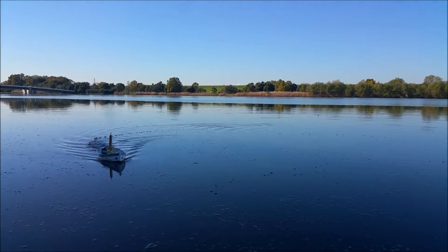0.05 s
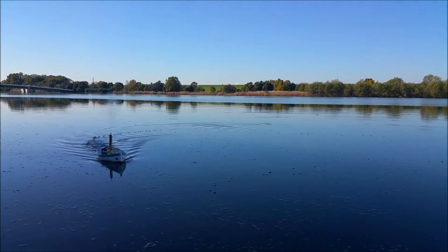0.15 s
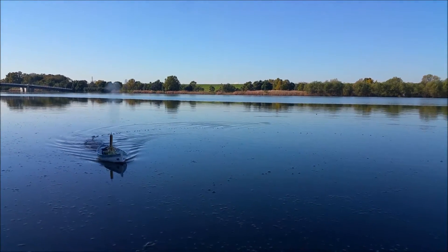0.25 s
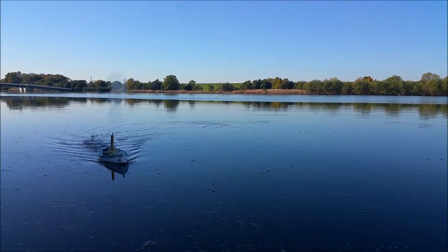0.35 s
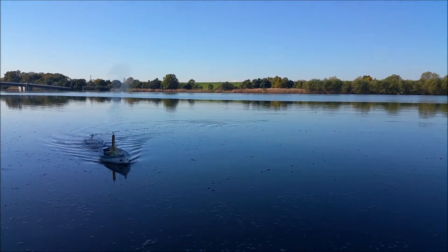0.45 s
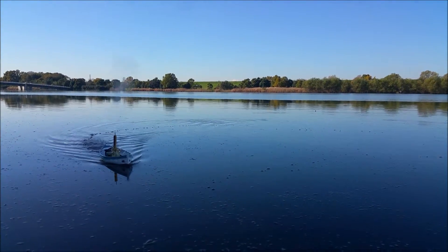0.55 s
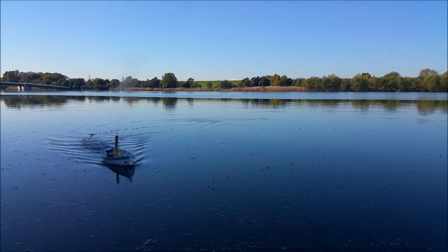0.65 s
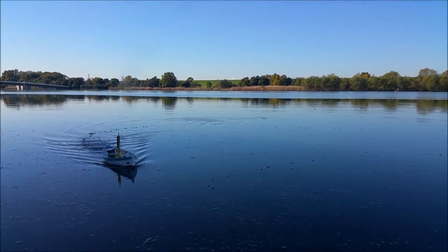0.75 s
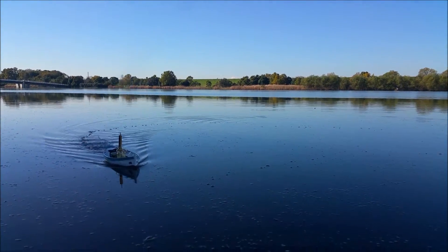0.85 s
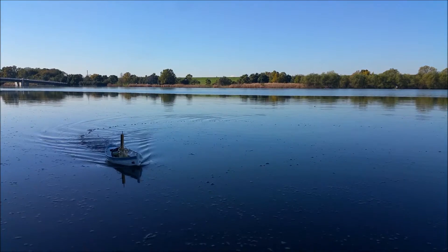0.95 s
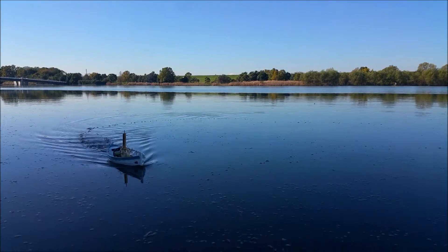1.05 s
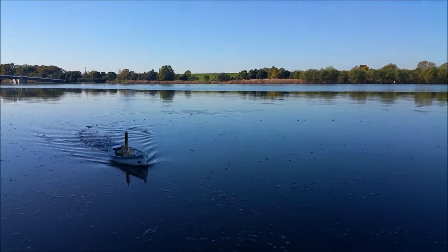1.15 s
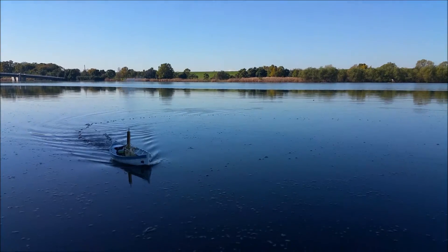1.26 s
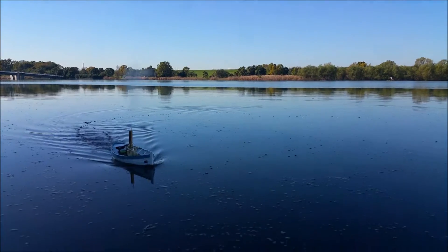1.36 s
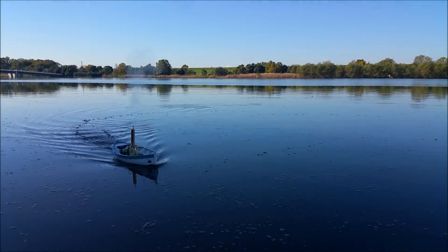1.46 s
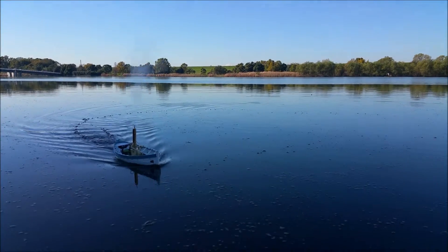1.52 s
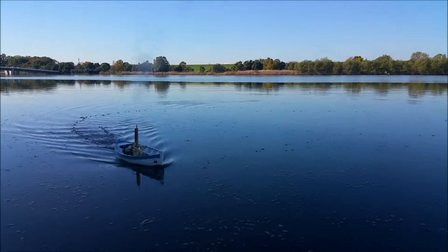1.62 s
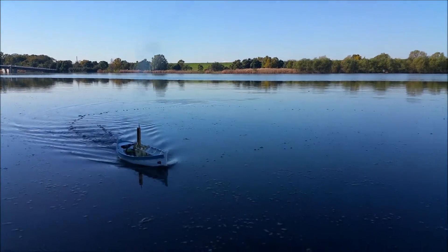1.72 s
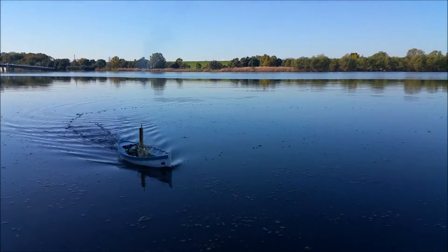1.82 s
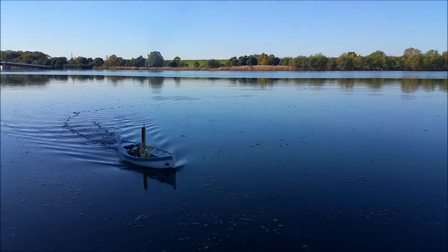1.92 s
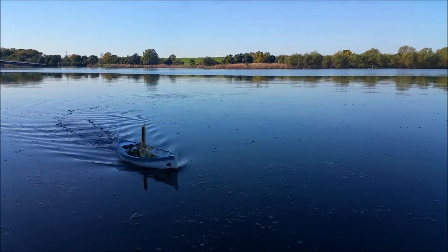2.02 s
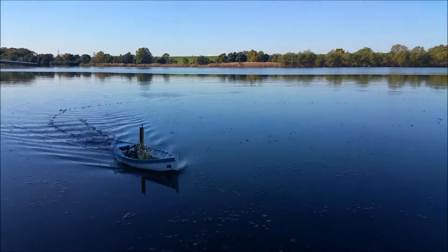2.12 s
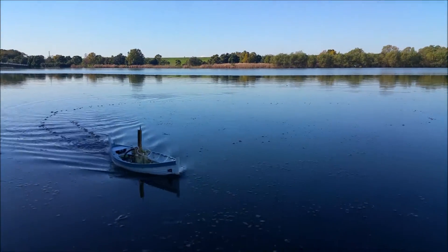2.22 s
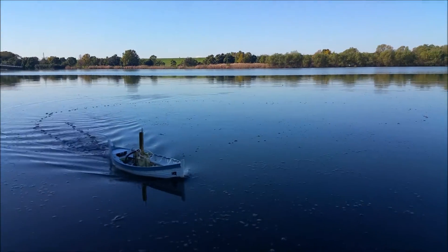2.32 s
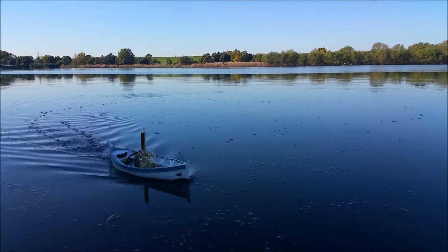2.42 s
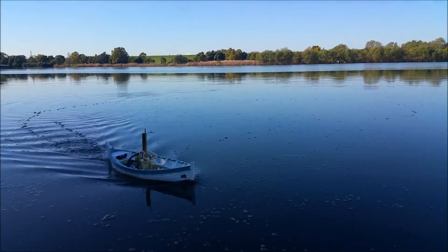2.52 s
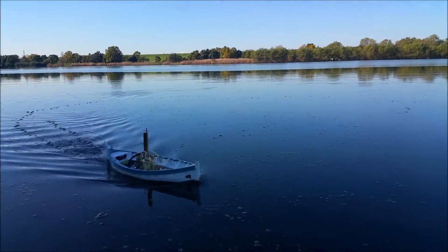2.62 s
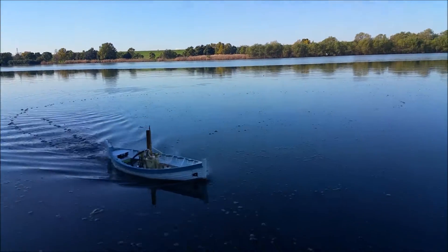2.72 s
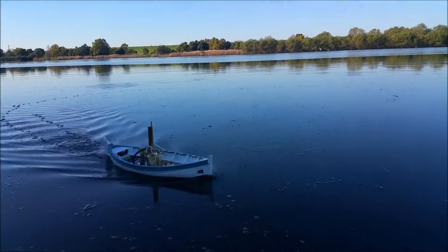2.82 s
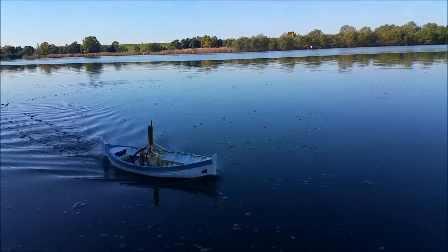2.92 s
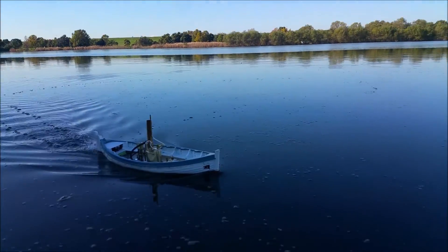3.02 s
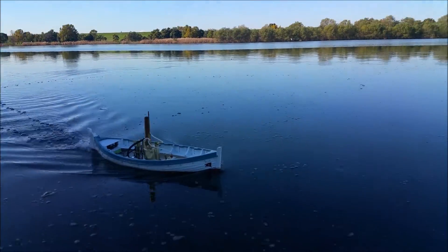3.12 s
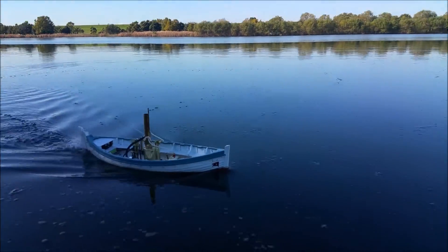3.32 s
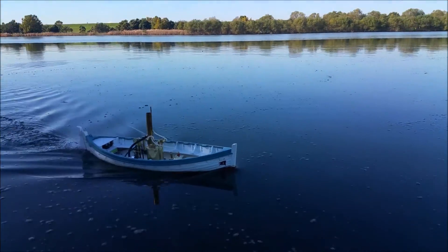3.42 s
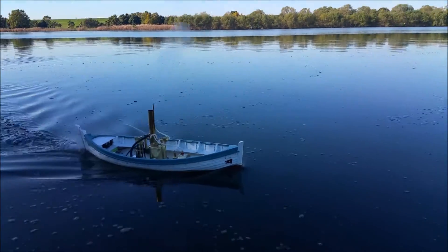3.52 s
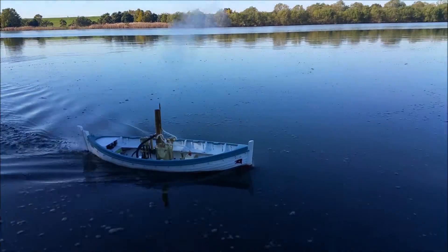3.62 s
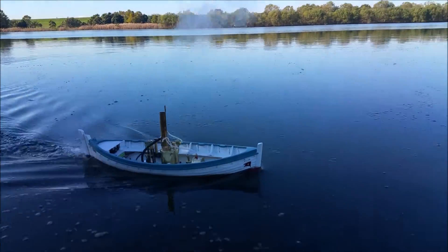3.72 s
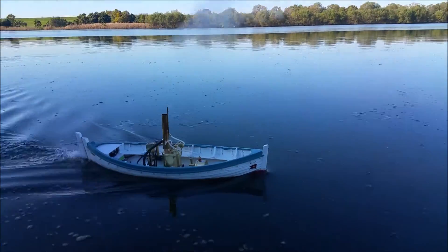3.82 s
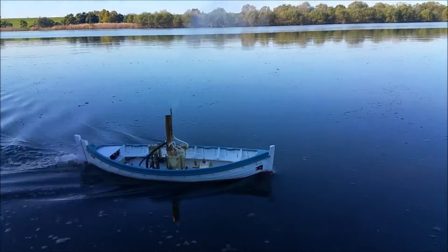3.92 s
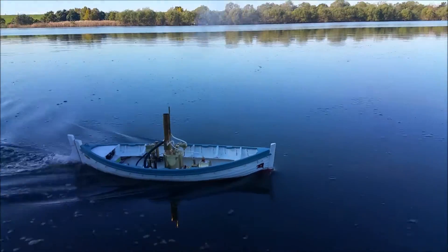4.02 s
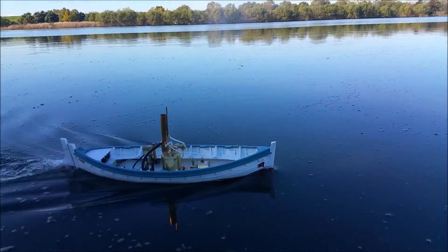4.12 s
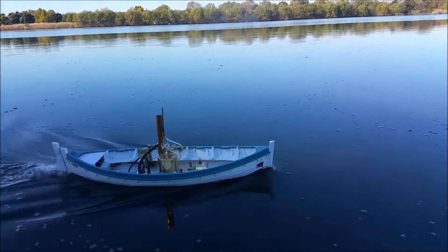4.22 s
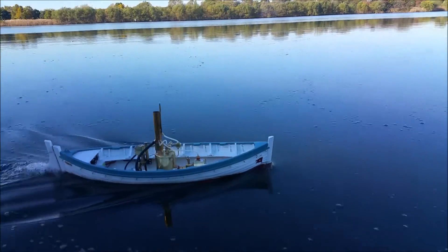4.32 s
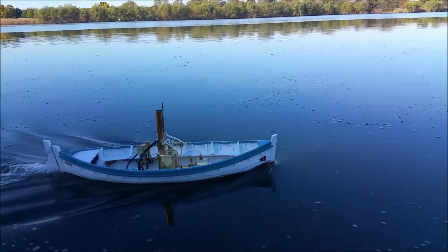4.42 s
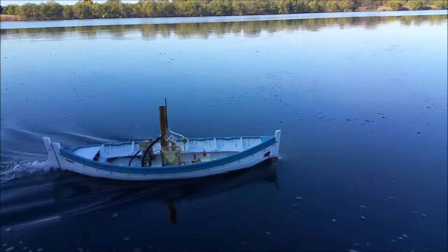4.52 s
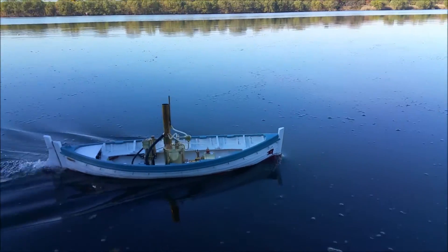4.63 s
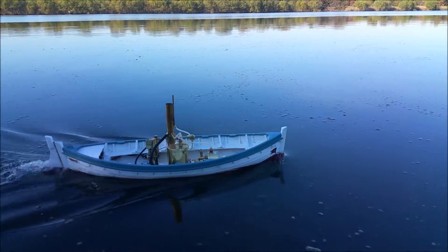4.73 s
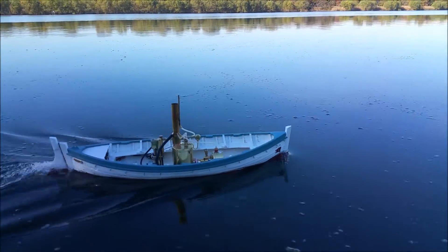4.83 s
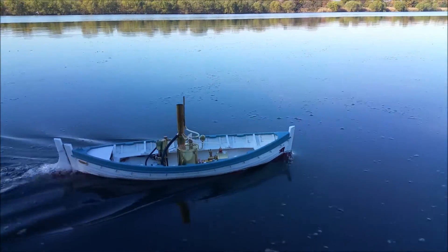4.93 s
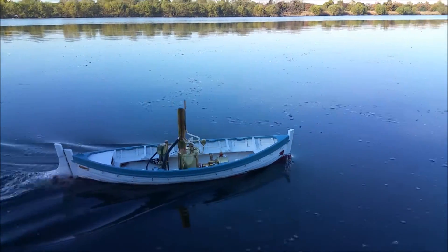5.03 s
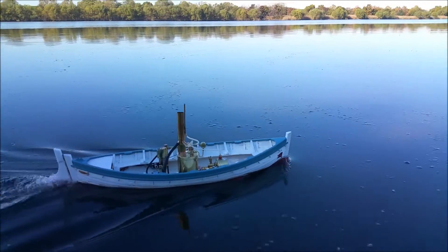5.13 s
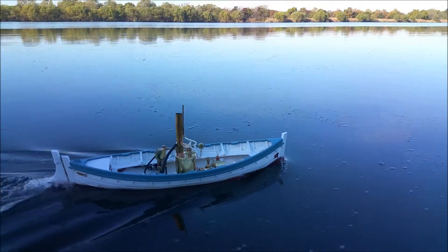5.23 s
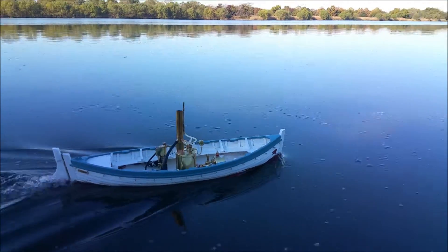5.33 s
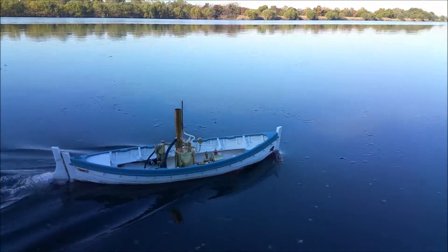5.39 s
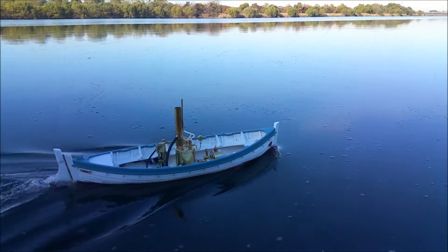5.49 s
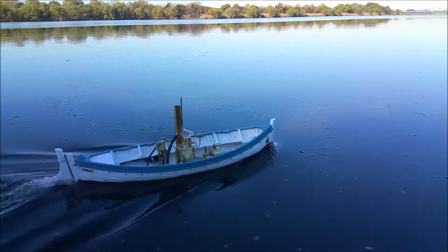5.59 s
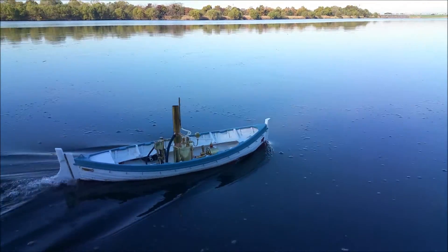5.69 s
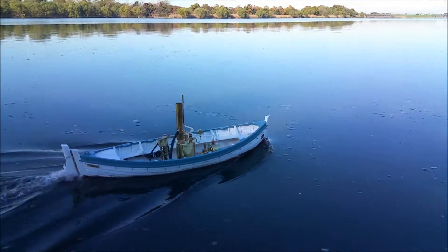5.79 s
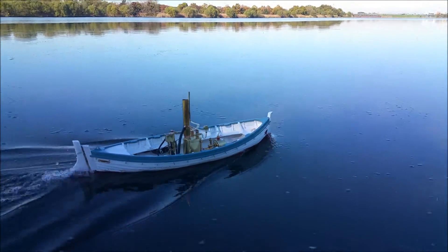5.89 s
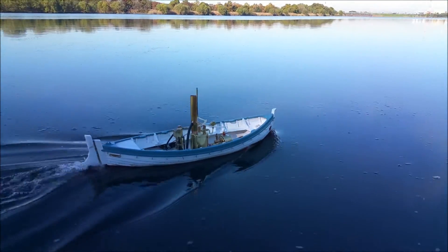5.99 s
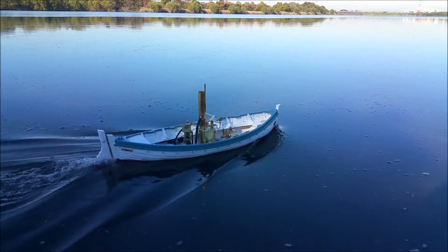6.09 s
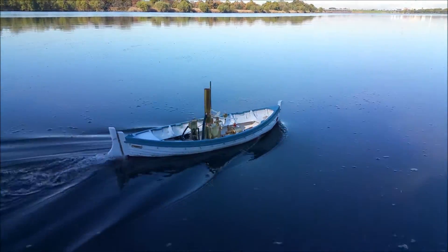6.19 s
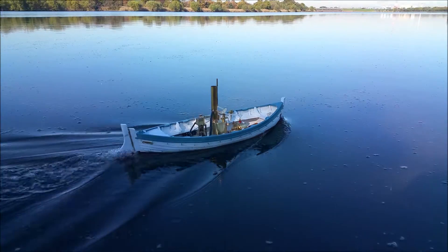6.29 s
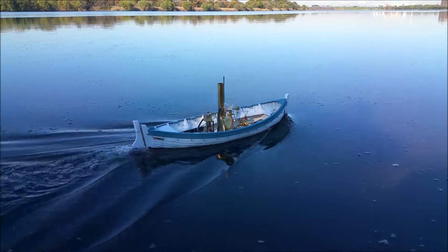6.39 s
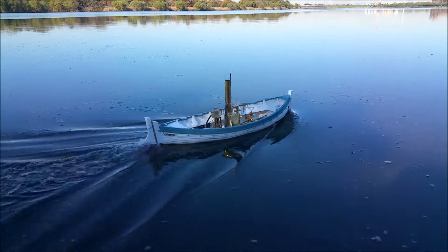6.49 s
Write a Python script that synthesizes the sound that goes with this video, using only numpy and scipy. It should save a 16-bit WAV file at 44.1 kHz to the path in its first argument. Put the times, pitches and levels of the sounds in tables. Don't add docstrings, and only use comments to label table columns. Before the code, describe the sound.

A small steam boat passes on a quiet lake, heard through a close little stereo microphone. From the start a hollow, breathy burner roar runs steadily over a faint distant rumble. After a tiny spit of steam, a very shrill whistle near 5.6 kHz sounds from 0.15 to 0.64 s, wavering between left and right; a second follows from 1.2 to 1.8 s. Both have steam hiss and faint quick echoes from the banks. The roar swells slowly, with occasional soft flame pops and a light metallic tick. A third, louder, fuller blast runs from 3.6 to 4.2 s. From about 4.4 s the boat is closest: fast, uneven valve-gear rattle at roughly 86 beats a second, leaking steam, crisp clicks, and many gurgling wake bubbles from 4.7 s. The sound eases only slightly by 6.5 s.

```python
import sys
import numpy as np
from scipy import signal
from scipy.io import wavfile
from scipy.ndimage import uniform_filter1d

SR = 44100
rng = np.random.default_rng(int(sys.argv[2]) if len(sys.argv) > 2 else 0)


def how_loud(loudness_db):
    steps = np.asarray(loudness_db, float) / 20
    return 10 ** steps


def wav_record(signal):
    frames = np.transpose(np.atleast_2d(signal))
    bounded = np.clip(frames, -1, 1)
    quanta = np.round(bounded * 32767).astype(np.int16)
    wavfile.write(sys.argv[1], SR, quanta)


N = 288855
T = np.arange(N) / SR
RATTLE_SLOPE = 1.58


def evened(x):
    return x / np.sqrt(np.mean(x ** 2) + 1e-20)


def read(points, hz):
    f, value = np.transpose(points)
    return np.interp(np.log(hz + 1), np.log(f + 1), value, left=-90, right=-90)


def curve(rows, t, column=1):
    return np.interp(t, [r[0] for r in rows], [r[column] for r in rows])


def add(mix, s, sound):
    part = mix[..., round(s * SR):][..., :sound.shape[-1]]
    part += sound[..., :part.shape[-1]]


def resonate(x, hz, width):
    return signal.lfilter(*signal.iirpeak(hz, hz / width, SR), x)


def ports(x, lead):
    return np.array([x, np.interp(np.arange(N) - lead, np.arange(N), x)])


def wander(rate):
    f = np.geomspace(.1 * rate, rate, num=24)[:, None]
    swings = np.sin(2 * np.pi * (f * T[::64] + rng.random(f.shape)))
    coarse = (swings / np.sqrt(f)).sum(0)
    return np.interp(T, T[::64], evened(coarse))


# t/s, nearness under the closest point level/dB, funnel note f/Hz, funnel mouth level/dB
PASS = [(0, -9.5, 1700, 1), (.4, -7.5, 1684, 1.5), (1.5, -6.5, 1765, -3), (2.05, -5, 1800, -1.5),
        (2.5, -5, 1770, -16), (2.95, -3, 1870, -6), (3.5, -2, 1830, -10), (4.1, -2.5, 1740, 0),
        (4.55, 0, 1755, 1), (5.75, 0, 1790, 4.5), (6.4, -0.5, 1753, 2), (6.55, -1, 1760, -0.5)]


def level(top_db, slope, flicker_db):
    return how_loud(top_db + slope * curve(PASS, T) + flicker_db * wander(rate=12))


# t/s, left lead [samples]
LEAD = [(0, 9.5), (3.5, 3.8), (4.2, 11.1), (5.2, 7.4), (6.55, 5.3)]
# f/Hz, likeness [0-1]
SAME = [(30, .9), (250, 0.97), (700, 0.96), (1400, 0.13), (2800, 0.21), (6000, 0.074), (15000, 0.057)]


def noise(colour, patchy_db, alike=0., lead=LEAD):
    t = np.arange(N // 256 + 5)[:, None] * 256 / SR
    hz = np.fft.rfftfreq(1024, 1 / SR)
    a, b, c, d, patches = np.moveaxis(rng.standard_normal((len(t), len(hz), 5)), 2, 0)
    patches = uniform_filter1d(patches, size=8, axis=0)
    patches = evened(uniform_filter1d(patches, size=10, axis=1))
    same_hz, likeness = np.transpose(SAME)
    same = np.clip(np.interp(np.log(hz + 1), np.log(same_hz), likeness), alike, 1)
    bend = hz / (hz + 1500)
    late = np.exp(-2j * np.pi * hz * curve(lead, t) / SR * bend)
    left = a + 1j * b
    right = same * late * left + np.sqrt(1 - same ** 2) * (c + 1j * d)
    z = np.array([left, right])
    size = how_loud(colour(t, hz) + 0 * t)
    z *= size / np.sqrt((size ** 2).sum(1, keepdims=True)) * how_loud(patchy_db * patches)
    return evened(signal.istft(z.transpose(0, 2, 1), nperseg=1024, noverlap=768)[1][:, :N])


# f/Hz, level/dB per Hz
SHORE = [(12, -48), (28, -24), (48, -2.5), (102, 1), (145, -3.5), (216, -16), (300, -11.5), (390, -41),
         (660, -120)]


def shore():
    return how_loud(-44) * noise(lambda t, hz: read(SHORE, hz), patchy_db=-0.5)


def mode_db(hz, mid_hz, width):
    return -20 * np.log10(1 + ((hz - mid_hz) / width) ** 2)


# f/Hz, level/dB per Hz
FAR = [(180, -47), (300, -15), (393, -5.5), (437, -6.5), (778, -2), (929, -12.5), (1020, -13),
       (1350, -24.5), (1670, -17.5), (2120, -22.5), (2590, -24.5), (5000, -41.5), (6500, -78),
       (11000, -120)]
# f/Hz, level/dB per Hz
NEAR = [(250, -15), (345, -16), (470, -0.2), (600, -0.9), (780, -16), (920, -7), (1050, -23.5), (1230, -14),
        (1450, -21.5), (2150, -22.5), (2420, -25.5), (4200, -30), (6000, -47)]
# t/s, share of the abeam colour [0-1]
TURN = [(0, 0.097), (2., 0.12), (3.2, 0.36), (4.5, 0.62), (6.55, 1.)]
# f/Hz, level/dB per Hz
BOOM = [(90, -18.5), (160, -2.5), (226, 5.5), (300, -4), (370, -54), (600, -3)]


def burner():
    def hull_db(t, hz):
        return read(FAR, hz) + curve(TURN, t) * (read(NEAR, hz) - read(FAR, hz))

    def funnel_db(t, hz):
        return mode_db(hz, curve(PASS, t, column=2), 75.0)

    def overtone_db(t, hz):
        return np.maximum(mode_db(hz, 2748, 44.), mode_db(hz, 3690, 60.) - 7)

    roar = noise(hull_db, patchy_db=1.51)
    note = noise(funnel_db, patchy_db=1.0, alike=0.96) * how_loud(curve(PASS, T, column=3))
    overtone = noise(overtone_db, patchy_db=.6, alike=.8)
    abeam_s, width_s, beam_db = 4.63, 0.5, 5.5
    overtone = overtone * how_loud(beam_db * np.exp(-((T - abeam_s) / width_s) ** 2))
    boom = noise(lambda t, hz: read(BOOM, hz), patchy_db=1.0)
    mix = roar * level(-27.5, slope=1.037, flicker_db=0.15)
    mix = mix + note * level(-40.5, slope=1, flicker_db=0.37)
    mix = mix + overtone * level(-47.5, slope=1.34, flicker_db=0.97)
    mix = mix + boom * level(-38, slope=1, flicker_db=1)
    return mix * how_loud([[.4], [-.4]])


# f/Hz, width/Hz, level/dB
GEAR = [(3700, 660, 11.5), (4505, 166, 13.5), (6050, 300, 6.5), (7650, 550, 3), (9000, 1500, 0),
        (11700, 3700, -4)]
# f/Hz, level/dB per Hz
AIR = [(2500, -14), (3200, -3), (7000, -2), (10000, -12), (15500, -17), (16500, -25)]


def engine():
    beats_per_s, unevenness = 86, .07
    turns = np.cumsum(beats_per_s * (1 + unevenness * wander(rate=3))) / SR
    luck = rng.standard_normal((700, len(GEAR) + 1)).clip(-2, 1.7)[turns.astype(int)]
    burst = np.exp(-(turns % 1) / .25) * how_loud(3.8 * luck[:, 0])
    rings = np.zeros((2, N))
    for k, (hz, width, db) in enumerate(GEAR):
        shake = burst * how_loud(db + 4 * luck[:, k + 1]) * rng.standard_normal((2, N))
        ring = resonate(resonate(shake, hz, width), hz, 1.5 * width)
        rings += ports(ring[0], curve(LEAD, T)) + 1.8 * ring * [[0], [1]]
    leak = noise(lambda t, hz: read(AIR, hz), patchy_db=1.7) * (1 + .9 * burst)
    return level(-45, RATTLE_SLOPE, flicker_db=1.5) * (0.71 * evened(rings) + evened(leak))


def taps(rows, cycles, glide, grit):
    out = np.zeros(N)
    for s, db, hz, snap_db in rows:
        u = np.arange(int(6 * cycles * SR / hz)) * hz / SR
        dull, bright = rng.standard_normal((2, 12000))
        ring = np.sin(2 * np.pi * u * (1 + glide * u / cycles))
        ring += grit * uniform_filter1d(dull, size=3)[:len(u)]
        ring += how_loud(snap_db + 7) * np.diff(bright)[:len(u)]
        envelope = np.exp(-u / cycles) * np.minimum(u / 0.43, 1)
        add(out, s, how_loud(db) * ring * envelope)
    return ports(out, curve(LEAD, T))


def faint_ticks():
    per_s, top_db, snap_db = 40, -40, -13
    luck = rng.random((int(per_s * N / SR), 3))
    s = luck[:, 0] * T[-1]
    db = top_db + RATTLE_SLOPE * curve(PASS, s) - 8 * luck[:, 1]
    hz = 3200 * 2 ** luck[:, 2]
    return np.transpose([s, db, hz, np.full(len(s), snap_db)])


# t/s, level/dB, f/Hz, snap level/dB
TICKS = [(2.473, -38, 5000, -18), (3.1101, -37, 3170, -6), (3.148, -52, 3750, -22),
         (3.4907, -37, 3870, -18), (4.3372, -34, 3530, -20), (4.429, -28, 5100, -28),
         (4.5004, -28, 5800, -21), (4.5912, -29.5, 5830, -24), (4.6406, -38, 3670, -24),
         (4.6944, -34, 4460, -18), (4.7812, -26, 5900, -7.5), (4.8276, -37, 3520, -23),
         (4.9977, -35, 3540, -38), (5.0446, -35, 4640, -21), (5.0925, -39, 6150, -22),
         (5.1145, -38, 3460, -21), (5.2452, -31, 6300, -23), (5.3045, -31.5, 5540, -20),
         (5.3739, -34, 6000, -24), (5.5051, -33, 4140, -5), (5.5425, -33, 5700, -21.5),
         (5.5914, -32, 3730, -17), (5.6243, -33, 6320, -21), (5.6518, -29, 5640, -26),
         (5.7934, -32, 3730, -21), (5.9336, -34, 3680, -21), (5.9935, -35, 3940, -17),
         (6.0419, -38, 4240, -21), (6.1137, -46, 4350, -18), (6.2918, -44, 3680, -13)]


def ticks():
    return taps([*TICKS, *faint_ticks()], cycles=8., glide=.003, grit=2.5)


# t/s, level/dB, f/Hz
PLOPS = [(4.723, -22, 870), (5.01, -20, 860), (5.09, -17, 1150), (5.214, -30, 960), (5.25, -15, 916),
         (5.285, -20, 910), (5.395, -19, 855), (5.541, -17.5, 880), (5.591, -19, 997), (5.645, -16, 925),
         (5.872, -23, 960), (5.944, -22, 851), (5.994, -18, 930), (6.114, -25, 990), (6.192, -17, 845),
         (6.351, -18, 870), (6.512, -21, 876)]
# t/s, level/dB, f/Hz
POPS = [(0.793, -20, 707), (0.946, -29, 614), (0.979, -25, 706), (1.042, -26, 493), (2.367, -21, 620),
        (2.582, -23, 627), (4.826, -17.5, 498), (5.323, -15.5, 605), (5.723, -21.5, 595), (5.897, -17, 540),
        (6.375, -15.5, 600)]
# t/s, level/dB, f/Hz
BUMPS = [
    (2.21, -37, 109),
    (4.28, -30.5, 112),
]


def wake():
    rows = [(*row, -45) for row in [*PLOPS, *POPS]]
    rows += [(*row, -68) for row in BUMPS]
    return taps(rows, cycles=3.55, glide=0.024, grit=.01)


def blast(rows, jet, voice):
    hiss_db, fizz_db, pan_db, octave0_db, octave1_db = jet
    pitch_hz, warm_s, lead0, lead1 = voice
    start, stop = rows[0][0], rows[-1][0]
    t = np.arange(start - .04, stop + .012, 1 / SR)
    held = t.clip(start, stop) - start
    share = held / held[-1]

    def slow(size):
        rough = rng.standard_normal((2, len(t)))
        return evened(uniform_filter1d(uniform_filter1d(rough, size), size))

    cold_hz, droop_hz_per_s, shut_hz, shut_s = 180, 32, 70, .006
    hz = pitch_hz - cold_hz * np.exp(-held / warm_s)
    hz = hz - droop_hz_per_s * held
    hz = hz - shut_hz * np.exp((held - held[-1]) / shut_s)
    missing = np.maximum(start - t, 0) / .0065 + np.maximum(t - stop, 0) / .0035
    waver_hz = 8. * slow(size=900)[0] + 8. * slow(size=160)[0] + (8. + 170 * missing) * slow(size=30)[0]
    phase = 2 * np.pi * np.cumsum(hz - 250 * missing + waver_hz) / SR

    left_db, right_db, lead = (curve(rows, t, k) for k in range(1, 4))
    note = how_loud([left_db, right_db] + 0.91 * slow(size=200)) * np.sin([phase + lead, phase])
    octave_lead = lead0 + (lead1 - lead0) * share
    octave_db = octave0_db + (octave1_db - octave0_db) * share
    octave_db = octave_db + 2.3 * slow(size=150) + 2.5 * slow(size=900)[0] + [[pan_db], [0]]
    octave = how_loud(octave_db) * np.sin([2 * phase + octave_lead, 2 * phase])
    speaks = how_loud(-15 * missing ** 1.6)
    closed = np.maximum(start + warm_s - t, 0) / (1.3 * warm_s + .006)
    closed = closed + np.maximum(t - stop, 0) / .004
    flow = how_loud([[hiss_db], [fizz_db]] - 14 * closed ** 3)
    return t[0], (note + octave * speaks ** 2) * speaks, flow


# delay t/s, level/dB
BANKS = [
    (.03, -28),
    (.045, -29),
    (.07, -33),
    (.097, -36),
    (.104, -36),
    (.2, -41),
]


def banks():
    t = np.arange(SR // 2) / SR
    fade = (how_loud(-60 * t / .42) + 3.5 * how_loud(-60 * t / .12)) * (t > .004)
    sparse = rng.choice([-1., 1.], (2, len(t))) * (rng.random((2, len(t))) < .03)
    echo = sparse * fade
    echo *= how_loud(-24) / np.linalg.norm(echo[0])
    for delay_s, db in BANKS:
        add(echo, delay_s, how_loud(db) * np.array([[1., 0, 0], [0, 0, 1.]]))
    return signal.lfilter(*signal.butter(3, 7500, fs=SR), echo)


# t/s, left peak level/dB, right peak level/dB, left lead [rad]
BLASTS = [
    [(.152, -19, -18, -2.8), (.167, -12, -11, -3.0), (.227, -21, -14, -5.0), (.267, -26, -9, -9.4),
     (.292, -16, -10, -8.2), (.352, -10, -10, -9.4), (.367, -8, -9, -8.9), (.587, -16, -11, -9.9),
     (.637, -15, -12, -9.5)],
    [(1.203, -14, -14, -3.6), (1.243, -15, -14, -3.7), (1.283, -29, -27, -1.7), (1.303, -11, -10, -3.5),
     (1.458, -6, -13, -3.7), (1.548, -18, -14, -3.9), (1.588, -15, -15, -2.5), (1.658, -13, -11, -4.1),
     (1.818, -18, -11, -4.4)],
    [(3.589, -10, -8, -5.2), (3.65, -12, -23, -5.0), (3.664, -7, -13, -5.6), (3.84, -8, -6, -4.7),
     (3.895, -15, -9, -3.5), (4.005, -4, -10, -3.3), (4.07, -11, -9, -4.9), (4.085, -7, -8, -3.3),
     (4.195, -9, -7, -4.8)],
]
# hiss level/dB, fizz level/dB, octave left-right level/dB, octave level/dB at start, at end
JETS = [
    (-39.5, -38, -10, -43, -40.5),
    (-36.5, -34.5, -2.5, -38, -29.5),
    (-34, -33, -3.5, -25.5, -28),
]
# pitch f/Hz, warm-up t/s, octave left lead [rad] at start, at end
NOTES = [
    (5563, .028, -2, 10.5),
    (5572, .004, -3.7, -2.4),
    (5582, .004, 4, -2),
]
# f/Hz, level/dB per Hz
STEAM = [(2500, -22.5), (4000, -11), (4900, -4.5), (5500, 2), (6500, -3.5), (8000, -9), (9900, -13),
         (11100, -10), (12500, -21.5), (16000, -23)]
# f/Hz, level/dB per Hz
FIZZ = [(12300, -45), (13700, -19), (14800, -12), (15600, 2), (16500, -13)]


def whistle():
    def fizz_colour(t, hz):
        wet = .7 * np.exp(-(t / .8) ** 2)
        return read(FIZZ, hz) * (1 - wet * (hz > 11000) * (hz < 16000))

    notes, jets = np.zeros((2, N)), np.zeros((2, N))
    for rows, jet, voice in zip(BLASTS, JETS, NOTES):
        s, note, flow = blast(rows, jet, voice)
        add(notes, s, note)
        add(jets, s, flow)
    spit_s, spit_hz, spit_db = .127, 4900, -21
    u = np.arange(-.004, .004, 1 / SR)
    spit = np.sin(2 * np.pi * spit_hz * u + [[2.4], [0]]) * np.exp(-(u / .002) ** 2)
    add(notes, spit_s - .003, how_loud(spit_db) * spit)
    hiss = jets[0] * noise(lambda t, hz: read(STEAM, hz), patchy_db=2.5, alike=0.12)
    fizz = jets[1] * noise(fizz_colour, patchy_db=1.2, alike=.8, lead=[(0, 4.)])
    direct = notes + hiss + fizz * how_loud([[-.8], [.8]])
    return direct + signal.fftconvolve(direct, banks(), axes=1)[:, :N]


def scene():
    return shore() + burner() + engine() + ticks() + wake() + whistle()


# f/Hz, level/dB under the loudest line
GATE = [(2000, -72), (3000, -54), (4400, -53), (5000, -64), (7200, -55), (10000, -58), (12000, -58),
        (13500, -54.5), (14300, -66)]


def gated(x):
    hz, t, z = signal.stft([x[0] + x[1], x[0] - x[1]], SR, nperseg=1024, noverlap=768)
    power = abs(z) ** 2
    band = power[0, :512].reshape(128, 4, -1).mean(1)
    band = uniform_filter1d(band, size=7, axis=1)
    waver_db = 2.6 * evened(uniform_filter1d(rng.standard_normal(band.shape), size=14, axis=1))
    loudest = uniform_filter1d(power.sum(0).max(0), size=8)
    limit = loudest * how_loud(2 * read(GATE, hz[2:512:4])[:, None] + 2 * waver_db)
    z[0, :512] *= np.repeat(band > limit, 4, axis=0)
    both, apart = signal.istft(z, SR, nperseg=1024, noverlap=768)[1][:, :N] / 2
    return np.array([both + apart, both - apart])


def top_cut(x):
    return signal.sosfilt(signal.butter(12, 17100, fs=SR, output="sos"), x)


def record(dry):
    edge = signal.firwin(601, 15720, window=("kaiser", 9), fs=SR)
    mix = gated(signal.oaconvolve(dry, edge[None], "same"))
    return top_cut(mix)


dry = scene()
out = record(dry)
wav_record(out)
```